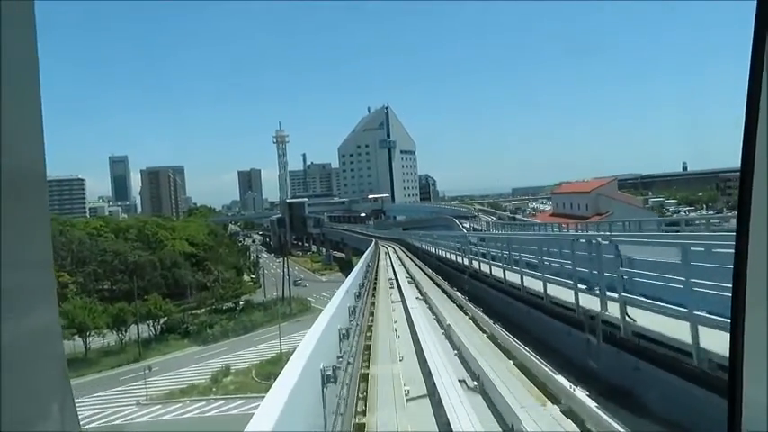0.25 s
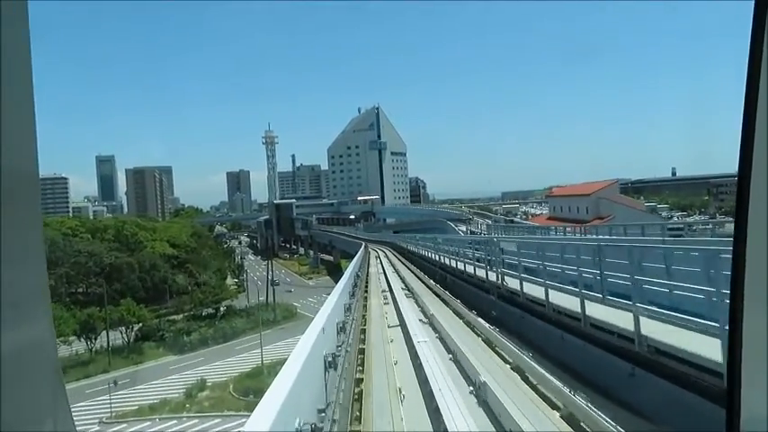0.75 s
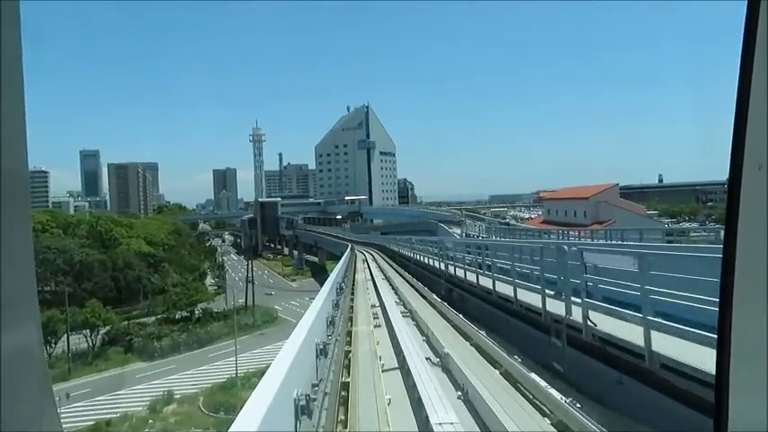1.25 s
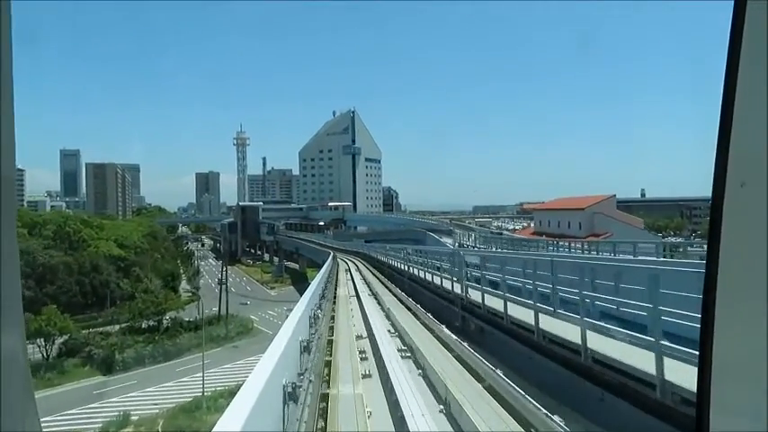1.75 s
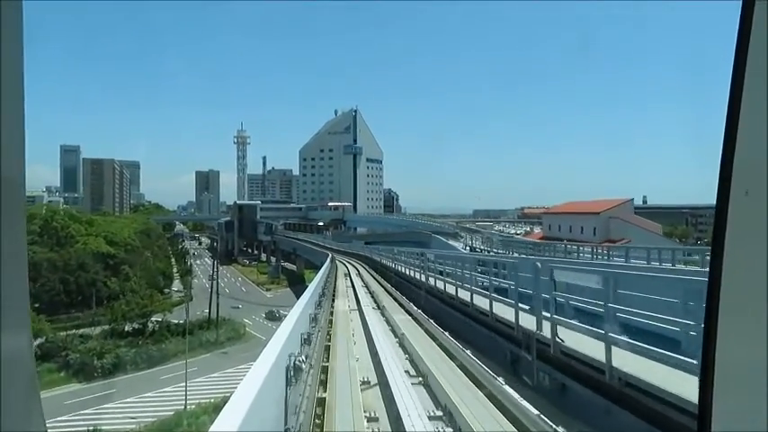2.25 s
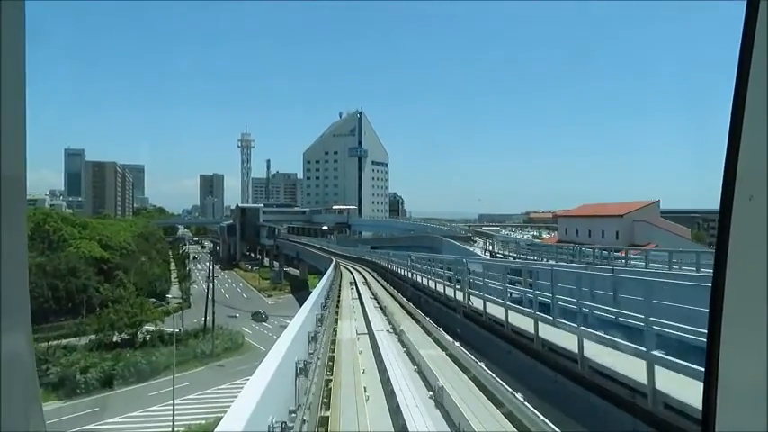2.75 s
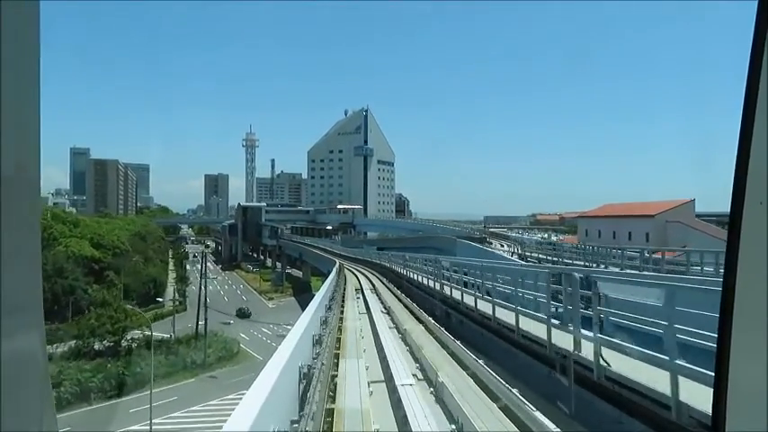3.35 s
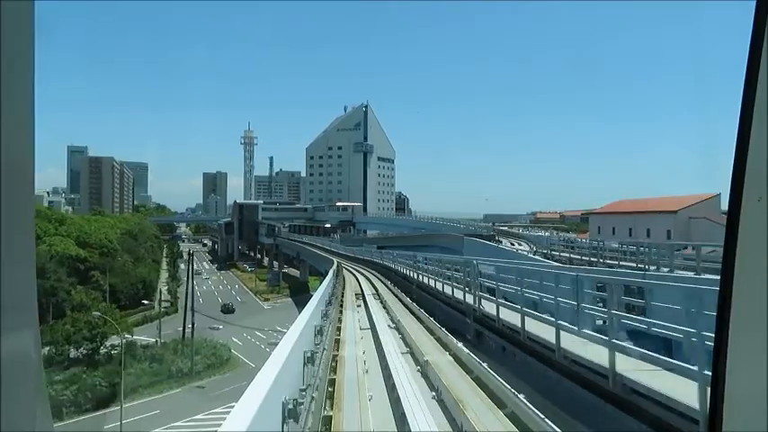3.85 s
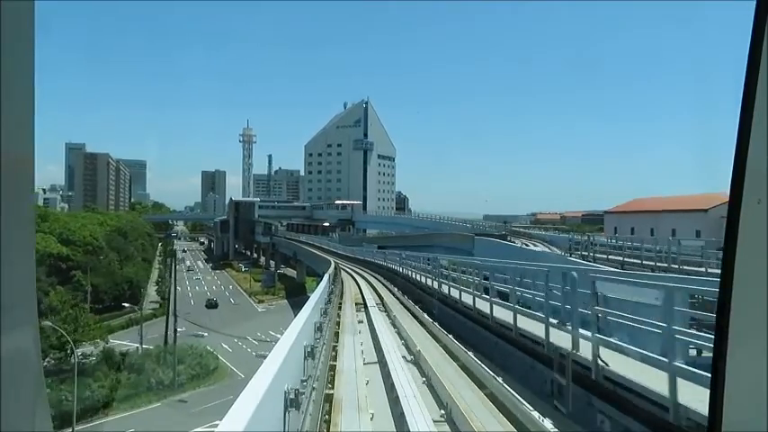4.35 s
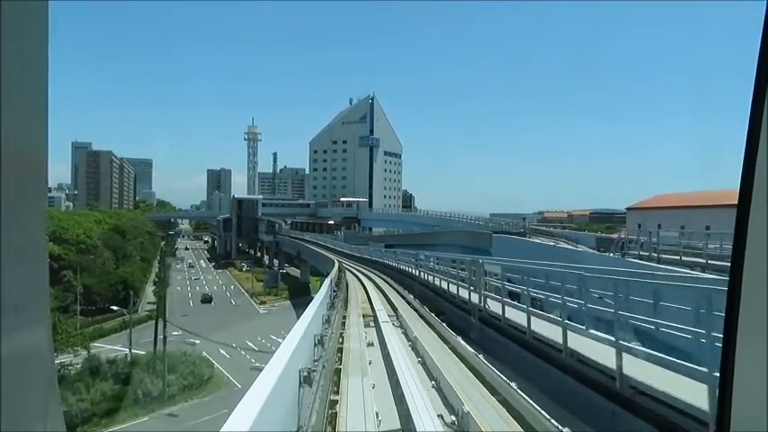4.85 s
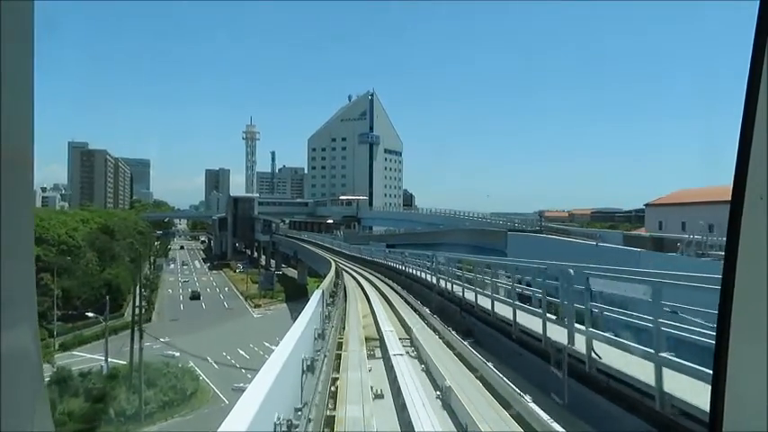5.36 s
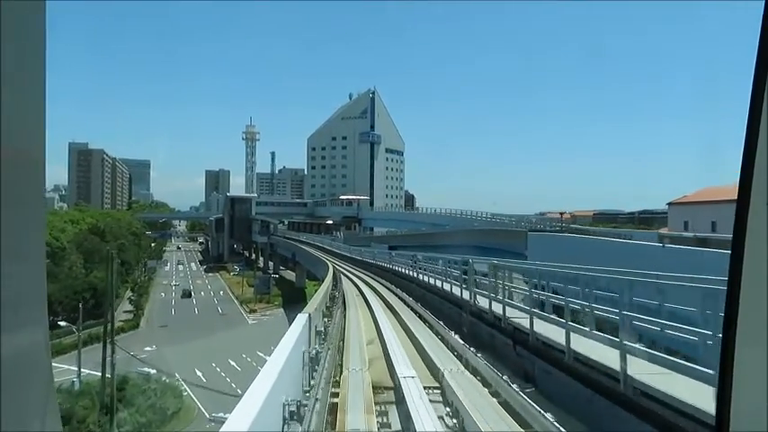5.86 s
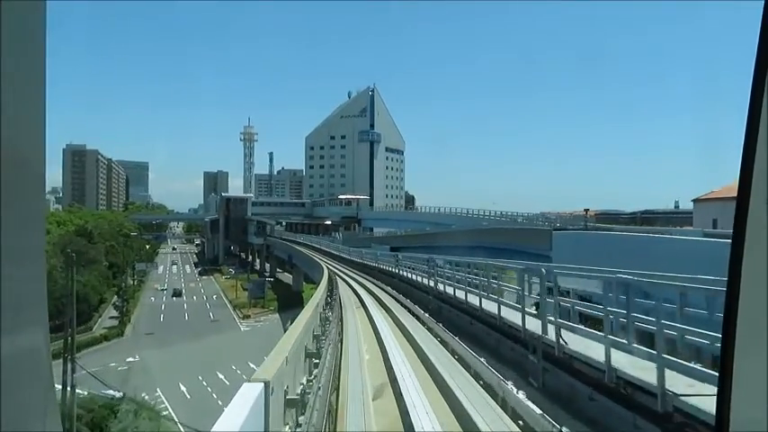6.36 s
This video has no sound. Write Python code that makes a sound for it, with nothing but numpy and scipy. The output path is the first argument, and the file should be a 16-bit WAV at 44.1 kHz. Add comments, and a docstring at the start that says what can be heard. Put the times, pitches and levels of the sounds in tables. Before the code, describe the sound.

Inside a rubber-tyred train, a deep shuddering rumble rolls on with soft joint thuds, a faint gear whine and an on-and-off hum.

```python
"""Inside the cabin of a rubber-tyred train on a raised concrete guideway, behind the front window.
Air hisses, the tyres roar and rumble on the concrete, and joints in it thud softly under the wheels.
The gears whine a little higher as the train gathers speed, and the tyre tread hums, drops out and
returns. Loudest of all, the car body shudders on its tyres and the floor booms."""
import sys
import numpy as np
from scipy import signal
from scipy.fft import rfft, irfft
from scipy.io import wavfile
from scipy.ndimage import uniform_filter1d

SR = 44100
rng = np.random.default_rng(int(sys.argv[2]) if len(sys.argv) > 2 else 0)


def wav_record(signal):
    """Record a signal, one row per channel, as 16-bit PCM in the file named by sys.argv[1]."""
    frames = np.transpose(np.atleast_2d(signal))
    bounded = np.clip(frames, -1, 1)
    # unit amplitude maps onto the largest positive 16-bit level
    quanta = np.round(bounded * 32767).astype(np.int16)
    wavfile.write(sys.argv[1], SR, quanta)


N = 291127
T = np.arange(N) / SR
SLOW = T[::64]  # coarse clock for slowly changing levels
FFT_SIZE = 2 ** 14 * (N // 2 ** 14 + 1)
FREQ = np.maximum(np.arange(FFT_SIZE // 2 + 1) * SR / FFT_SIZE, 1)


def undb(db):
    """Turn decibels into a gain."""
    return 10 ** (np.asarray(db) / 20)


def unit(x):
    """Scale to an average power of 1."""
    return x / np.sqrt(np.mean(x ** 2))


def curves(table):
    """Join a table's points with straight lines in time, one curve per column."""
    times, *columns = np.transpose(table)
    return [np.interp(T, times, column) for column in columns]


def colour(points):
    """Gain at each frequency from (frequency [Hz], level [dB]) points, silent outside them."""
    hz, db = np.transpose(points)
    return undb(np.interp(np.log(FREQ), np.log(hz), db, left=-200, right=-200))


def wander(rate):
    """A smooth random wobble of size 1, with `rate` new values a second."""
    hold = int(SR / rate)
    steps = np.repeat(rng.standard_normal(N // hold + 1), hold)
    return unit(uniform_filter1d(uniform_filter1d(steps, hold), hold)[:N])


def noise(points):
    """Steady noise of a given colour."""
    return unit(irfft(rfft(rng.standard_normal(FFT_SIZE)) * colour(points), FFT_SIZE)[:N])


def tone(hz, db, waver_hz, rate):
    """A pure tone whose pitch wavers at random."""
    return np.sqrt(2) * undb(db) * np.sin(2 * np.pi * np.cumsum(hz + waver_hz * wander(rate)) / SR)


def patchy(points, shared_db, own_db):
    """Noise in octave bands that follow the road texture together and also flicker alone."""
    out, texture = 0, wander(9)
    spectrum = rfft(rng.standard_normal(FFT_SIZE)) * colour(points)
    for octave in range(5, 15):
        share = np.cos(np.pi / 2 * np.clip(np.log2(FREQ) - octave, -1, 1)) ** 2
        band = irfft(spectrum * share, FFT_SIZE)[:N]
        out = out + band * undb(shared_db * texture + own_db * wander(14))
    return unit(out)


def even_out(x, hold_s, share):
    """Partly iron out the chance swells of a noise."""
    size = int(hold_s * SR)
    power = uniform_filter1d(uniform_filter1d(x ** 2, size), size)
    return unit(x / (np.abs(power) + 0.067 * np.mean(power)) ** (share / 2))


# Colour of the noise that differs between the ears: (frequency [Hz], relative level [dB])
WIDTH_COLOUR = [(70, -50), (123, -28), (200, -20.5), (253, -13), (320, -7), (420, -13.5), (531, -18),
                (717, -18.5), (926, -12.5), (1040, -14), (1300, -17.5), (2400, -22), (5200, -30),
                (7000, -30.5), (10000, -36.5), (14000, -37), (15400, -48)]

def stereo_width(wheels, hiss_db, lag_s=6.6e-5, bass_cut_hz=260):
    """Faint noise spreads out; wheel sounds come from the right and reach the left ear late."""
    spread_db = -57 + 0.8 * (hiss_db - hiss_db.mean())
    spread = undb(spread_db) * patchy(WIDTH_COLOUR, shared_db=0, own_db=1.4)
    side = spread - lag_s / 2 * SR * np.gradient(wheels)  # taking away the slope acts as a tiny delay
    bass_cut = np.sqrt(1 + (bass_cut_hz / FREQ) ** 6)  # deep bass stays in the middle
    return irfft(rfft(side, FFT_SIZE) / bass_cut, FFT_SIZE)[:N]


# Colours of the hiss and the roar: (frequency [Hz], relative level [dB])
HISS_COLOUR = [(2500, -8.5), (3300, -0.5), (4000, -3.5), (8000, -16.5), (12000, -25.5), (13800, -28),
               (15300, -40)]
ROAR_COLOUR = [(900, -35.5), (1060, -9.5), (1300, -9), (1500, -14), (2000, -18.5), (2500, -22),
               (2750, -22.5), (3100, -28.5), (4200, -48.5)]
# How loud the concrete is under the tyres: (time [s], relative roar [dB], relative hiss [dB])
ROAD_LEVELS = [(0.0, -55, -57), (0.03, -43, -59.5), (0.09, -46, -57.5), (0.68, -44.5, -56.5),
               (0.79, -50, -57), (0.84, -45, -55.5), (0.96, -46.5, -58.5), (1.16, -46.5, -53.5),
               (1.17, -40, -54.5), (1.27, -46, -54.5), (1.71, -40.5, -51.5), (1.75, -46, -56.5),
               (1.76, -43, -54.5), (2.22, -44, -54), (2.33, -46, -56.5), (2.48, -44, -51),
               (2.59, -43, -54.5), (2.61, -47.5, -58), (3.18, -42.5, -53.5), (3.29, -45.5, -55.5),
               (3.34, -42, -52.5), (3.56, -44.5, -55.5), (3.67, -42.5, -54), (3.79, -48, -57),
               (4.13, -44, -54.5), (4.23, -48, -56), (4.25, -41, -56), (4.28, -45.5, -54.5),
               (4.7, -42, -53.5), (4.8, -44.5, -56), (4.94, -41.5, -54.5), (5.0, -46.5, -57),
               (5.44, -42, -54), (5.5, -44.5, -54.5), (5.62, -42, -55), (5.64, -47.5, -58),
               (5.84, -45, -55), (5.97, -47.5, -57), (6.17, -44.5, -56), (6.6, -43, -53)]

def road_noise(ease_s=0.042, cabin_air_db=-64):
    """Tyres roar and hiss on concrete over the rush of cabin air. Also returns the hiss curve."""
    roar_db, hiss_db = uniform_filter1d(curves(ROAD_LEVELS), int(ease_s * SR), axis=1)
    roar_gain = undb(0.61 * roar_db + 0.4 * hiss_db + 6.5)
    hiss_gain = np.hypot(undb(hiss_db - 5), undb(cabin_air_db))
    roar = roar_gain * patchy(ROAR_COLOUR, shared_db=0.58, own_db=0.65)
    hiss = hiss_gain * patchy(HISS_COLOUR, shared_db=0.5, own_db=1.0)
    return roar + hiss, hiss_db


# Colours of the low tyre sounds: (frequency [Hz], relative level [dB])
RUMBLE_COLOUR = [(110, -22), (150, -2), (170, -3.5), (216, -1.5), (253, -8.5), (275, -14), (330, -32)]
DRONE_COLOUR = [(270, -3), (305, 3.5), (345, 0), (415, -5.5), (445, -2), (470, -6.5), (520, -5.5),
                (550, -10), (570, -1.5), (595, -5), (700, -5), (880, -2), (1000, -5.5), (1060, -16),
                (1200, -21)]
# Their loudness between joints: (time [s], rumble level [dB], relative drone level [dB])
TYRE_LEVELS = [(0.0, -37.5, -46), (0.13, -37, -38.5), (0.39, -42, -44.5), (0.48, -39, -41),
               (0.94, -41, -41), (1.32, -31, -39.5), (1.36, -46, -39), (1.4, -36.5, -37.5),
               (2.96, -35, -41), (3.14, -40.5, -39), (3.44, -30, -36.5), (3.47, -40, -40), (3.64, -33, -39),
               (3.67, -37, -41.5), (4.17, -34.5, -38.5), (4.36, -39, -41.5), (4.39, -35, -37),
               (4.72, -34.5, -38), (4.76, -31.5, -42.5), (4.8, -39, -41), (5.77, -38.5, -40.5),
               (5.92, -31.5, -41), (5.97, -39, -42.5), (6.6, -34, -38)]

def tyre_rumble(jolt):
    """Rolling tyres make a low rumble and a higher drone; both swell at each joint."""
    rumble_db, drone_db = curves(TYRE_LEVELS)
    rumble_gain = np.hypot(undb(rumble_db + 1.2 * wander(11)), jolt)
    drone_gain = np.hypot(undb(drone_db + 3.5), 0.4 * jolt)
    rumble = rumble_gain * even_out(noise(RUMBLE_COLOUR), hold_s=0.052, share=0.63)
    drone = drone_gain * patchy(DRONE_COLOUR, shared_db=0, own_db=1.43)
    return rumble, drone


# Joints in the concrete: (time [s], strength [dB], brightness [dB per octave])
JOINTS = [(0.113, -28, -4), (0.477, -33, -6), (0.659, -34, 7), (1.296, -33, -9), (1.466, -30, 8),
          (1.817, -34.5, 0), (1.986, -36, -6), (2.026, -33, 1), (2.212, -32.5, 13), (2.453, -32.5, -2),
          (3.425, -32, -10), (3.976, -42, 7), (4.152, -32.5, -13), (4.619, -33, 11.5), (4.719, -37, -3),
          (5.275, -42, -4), (5.595, -34.5, 16), (5.841, -35, -3), (5.885, -35.5, -2), (5.93, -38, -10),
          (6.495, -36, 6)]
# Notes the floor panels ring at: (pitch [Hz], relative level [dB], time to fade by 60 dB [s])
PANEL_NOTES = [(199.5, 10.5, 0.047), (232, 2.5, 0.04), (350, 7.5, 0.07), (408, 0, 0.06), (458, 3.5, 0.076),
               (506, -3.5, 0.05), (590, -13, 0.031), (685, -14, 0.054)]

def joint_thuds(push_s=0.008):
    """Each joint rings the floor panels briefly; rubber softens the blow, and no two are alike."""
    out, t = np.zeros(N + SR), np.arange(SR // 3) / SR
    hz, note_db, fade_s = np.transpose(PANEL_NOTES)[:, :, None]
    rise = np.sin(np.pi / 2 * np.clip(t / push_s, 0, 1)) ** 2
    fade = np.exp(-np.log(1000) * t / fade_s)
    chance = rng.random((len(JOINTS), 3, len(hz), 1))
    for (time, db, brightness), (phase, detune, size) in zip(JOINTS, chance):
        gain = undb(note_db + brightness * np.log2(hz / 335) + 3 * (size - 0.5))
        pitch = hz * (1 + 0.034 * (detune - 0.5))
        ring = gain * np.sin(2 * np.pi * (pitch * t + phase)) * fade
        start = int(time * SR)
        out[start:start + len(t)] += undb(db) * rise * ring.sum(axis=0)
    return out[:N]


def joint_jolts(rise_s=0.028, fall_s=0.046):
    """The gain of the rumble each joint sets off: it peaks just after the blow, then dies away."""
    time, db, _ = np.transpose(JOINTS)[:, :, None]
    since_peak = SLOW - time - rise_s
    swell = np.exp(-np.where(since_peak < 0, (since_peak / rise_s) ** 2, since_peak / fall_s))
    return np.interp(T, SLOW, (undb(db - 5.5) * swell).sum(axis=0))


# How fast the gear teeth meet, rising with speed: (time [s], pitch [Hz])
GEAR_PITCH = [(0, 907), (.9, 911), (1.8, 920.5), (3, 933), (4.2, 939), (5.4, 942), (6.6, 943)]
# Loudness of the whine and of its octave (twice the pitch): (time [s], relative level [dB])
WHINE_LEVELS = [(0.0, -56), (0.18, -46), (0.22, -53), (0.48, -56), (0.51, -46.5), (1.25, -50),
                (1.54, -39.5), (1.56, -45), (1.69, -37), (1.78, -46), (1.82, -40), (2.28, -47), (2.39, -40),
                (2.48, -50), (2.54, -38), (2.7, -51), (2.85, -40.5), (3.33, -42), (3.47, -36.5),
                (3.66, -45), (3.67, -40), (3.82, -46.5), (3.95, -36.5), (4.04, -45), (4.15, -38),
                (4.19, -47), (4.37, -47), (4.39, -39), (4.58, -46), (5.22, -47), (5.39, -43), (5.83, -47.5),
                (5.9, -43), (5.94, -50), (6.07, -47), (6.6, -43)]
OCTAVE_LEVELS = [(.4, -67), (.65, -55), (.95, -68), (1.11, -52.5), (1.25, -56.5), (1.6, -49.5), (1.72, -50),
                 (1.88, -44), (2.0, -52), (2.05, -55), (2.29, -54), (2.45, -68)]
# Colour of the noise ringing in the gear case: (frequency [Hz], relative level [dB])
CASE_COLOUR = [(800, -24), (850, -7), (900, -3), (940, -1.5), (985, -5), (1010, -10.5), (1040, -25)]

def gear_whine():
    """Gear teeth whine unevenly in a rattling case; two higher tones swell once."""
    hz, db, octave_db = curves(GEAR_PITCH)[0], curves(WHINE_LEVELS)[0], curves(OCTAVE_LEVELS)[0]
    flicker_db = 2.6 * wander(55) + 0.73 * wander(15)
    whine = tone(hz, db - 2.5 + flicker_db, waver_hz=4.105, rate=70)
    case = undb(uniform_filter1d(db, SR // 5) - 4) * noise(CASE_COLOUR)
    octave = tone(2 * hz, octave_db + 0.8 * wander(30), waver_hz=2.4, rate=30)
    third_harmonic = tone(3 * hz, octave_db - 13 + 3 * wander(20), waver_hz=9, rate=40)
    return whine + case + octave + third_harmonic


# When the tread hums: (start [s], length [s], start level [dB], middle level [dB], end level [dB])
HUM_STRETCHES = [(0, 0.4, -32.5, -34, -34), (.57, .39, -34.5, -29, -32), (1.08, 0.21, -33, -27.5, -33.5),
                 (1.5, 0.4, -32, -27.5, -30), (1.93, 0.57, -27.5, -34, -40), (2.58, 0.82, -36, -31, -40.5),
                 (3.46, 0.54, -34.5, -29.5, -36.5), (4.26, 0.36, -34.5, -31, -29),
                 (4.79, 0.38, -37, -34, -31.5), (5.2, 0.095, -41, -43, -43),
                 (5.39, 0.29, -29.5, -29.5, -29.5), (5.8, 0.068, -44, -37, -38),
                 (5.97, 0.47, -32.5, -35, -33.5), (6.51, 0.19, -30.5, -32.5, -35)]
# Brief dips in the hum: (time [s], depth [dB])
HUM_DIPS = [(.18, 4), (.78, 14), (1.589, 4), (1.83, 4), (2.03, 10), (2.15, 8), (2.79, 7), (3.0, 6),
            (3.6, 5.5), (3.83, 6), (4.39, 15), (4.54, 5.5), (5.11, 0), (5.51, 8), (6.05, 4), (6.161, 4),
            (6.33, 9)]
# Colour of the noise around the hum: (frequency [Hz], relative level [dB])
TREAD_COLOUR = [(262, -22), (283, -1.5), (296, 0), (315, -6), (350, -20.5)]

def tread_hum(attack_s=0.025, release_s=0.044, dip_s=0.029, rest_db=-46, teeth_per_tread=3.172):
    """Tread blocks hum at a pitch that follows the speed; the hum sets in, dips and falls back."""
    gain = np.full(len(SLOW), undb(rest_db))
    for start, length, *levels in HUM_STRETCHES:
        end = start + length
        ramp = np.minimum((SLOW - start) / attack_s, (end - SLOW) / release_s)
        gate = np.clip(ramp + 0.5, 0, 1) ** 2
        db = np.interp(SLOW, [start, start + length / 2, end], levels)
        gain = np.maximum(gain, gate * undb(db))
    dips_db = sum(depth * np.exp(-((SLOW - time) / dip_s) ** 2) for time, depth in HUM_DIPS)
    hz = curves(GEAR_PITCH)[0] / teeth_per_tread
    hum = tone(hz, 1.1 * wander(36), waver_hz=1.6, rate=25) + undb(-13.5) * noise(TREAD_COLOUR)
    return np.interp(T, SLOW, gain * undb(-dips_db)) * hum


# The floor's three deep notes: (pitch [Hz], waver size [Hz], waver rate [per s])
FLOOR_NOTES = [(75.65, 4.1, 14), (103.8, 9.93, 14), (136.7, 6.18, 12)]
# Their loudness, one list per note: (time [s], relative level [dB])
FLOOR_LEVELS = [
    [(0.0, -25), (0.09, -26.5), (0.33, -39), (0.72, -30), (0.73, -43), (0.77, -36), (1.17, -38),
     (1.3, -31.5), (1.58, -35), (1.71, -30), (1.76, -41), (1.91, -28.5), (2.0, -42), (2.02, -35),
     (2.26, -31), (2.37, -40), (2.48, -31), (2.54, -43), (2.61, -25), (2.65, -33.5), (3.09, -34.5),
     (3.12, -28), (3.2, -36), (3.4, -28), (3.55, -40), (3.64, -25), (3.67, -34), (4.03, -37), (4.06, -28),
     (4.41, -34.5), (4.47, -25.5), (4.52, -40), (4.61, -26), (4.67, -43), (4.69, -30), (4.8, -26),
     (4.82, -34), (5.04, -35), (5.07, -45), (5.39, -32), (5.4, -25), (5.75, -33.5), (5.92, -27.5),
     (6.07, -37.5), (6.19, -28), (6.32, -40), (6.38, -30), (6.6, -34)],
    [(0.0, -36), (0.18, -44), (1.1, -37), (1.21, -57), (1.3, -29), (1.87, -40), (2.5, -29), (2.68, -43),
     (2.92, -31), (3.0, -51), (3.01, -38), (3.93, -37.5), (4.1, -41), (5.2, -37), (5.26, -33), (5.77, -44),
     (5.84, -27), (5.9, -48), (6.34, -36), (6.6, -39)],
    [(0.0, -43), (0.16, -48), (2.37, -41.5), (2.39, -29.5), (2.76, -42), (3.29, -51), (3.33, -31),
     (3.55, -27.5), (3.73, -46), (3.79, -33), (4.28, -35), (4.37, -42.5), (5.94, -35), (6.01, -56),
     (6.19, -35), (6.6, -47)],
]

def floor_boom():
    """The floor booms in surges at its own notes, over a broad, low thrum."""
    out = undb(-32) * noise([(38, -0.5), (55, -8), (90, -5), (135, -13)])
    for (hz, waver_hz, rate), levels in zip(FLOOR_NOTES, FLOOR_LEVELS):
        db = curves(levels)[0] - 2.2 + 2 * wander(9.9)
        out += tone(hz, db, waver_hz, rate)
    return out


# The shaking of the car body: (time [s], pitch [Hz], relative level [dB])
SHUDDER = [(0.0, 24.9, -34.5), (0.09, 25.4, -36), (0.16, 27.8, -27), (0.27, 29.5, -23), (0.33, 30.6, -33.5),
           (0.62, 30.1, -29), (0.66, 30.2, -40), (0.7, 30, -22), (0.81, 30.3, -22), (0.84, 30.4, -38),
           (0.96, 30.1, -21), (1.05, 28.4, -28.5), (1.12, 27.8, -37), (1.29, 27.5, -29), (1.34, 27.4, -41),
           (1.45, 26.26, -23), (1.63, 27.8, -31), (1.8, 27.7, -26), (1.91, 29.2, -26), (2.13, 29.1, -28),
           (2.19, 30.95, -35), (2.22, 31.4, -25.5), (2.37, 31.6, -27), (2.52, 30.18, -28.5),
           (2.63, 30.1, -26), (2.77, 32.94, -32), (2.79, 32.8, -42), (2.87, 33.03, -26), (3.07, 31.94, -45),
           (3.14, 31.5, -25.5), (3.27, 33.05, -29.5), (3.38, 30.1, -28.5), (3.44, 30.2, -25.5),
           (3.62, 30.4, -33.5), (3.75, 27.5, -23.5), (4.01, 27.5, -34), (4.17, 27.6, -26),
           (4.26, 27.7, -38), (4.32, 27, -29), (4.39, 25, -37), (4.52, 24.87, -27), (4.65, 27.63, -28.5),
           (5.04, 27.55, -21.5), (5.11, 27.57, -40), (5.22, 27.7, -26), (5.27, 27.7, -42),
           (5.4, 27.76, -31), (5.51, 28.9, -26.5), (5.66, 28.87, -24), (5.72, 28.75, -31),
           (5.96, 30.5, -25.5), (6.01, 31.26, -36), (6.09, 31.45, -20.5), (6.21, 31.75, -35),
           (6.53, 31.63, -24), (6.6, 31.66, -30)]

def body_shudder():
    """The car shakes on its tyres: a very deep tone, with rough noise that follows its level."""
    hz, db = curves(SHUDDER)
    db = db - 1 + 1.7 * wander(7)
    rough = noise([(12, -7.5), (28, -16), (44, -12.5)])
    return tone(hz, db, waver_hz=2.466, rate=15) + undb(db - 8.5) * rough


def scene():
    """Add up the sources: both ears hear the same bass, while the treble differs between them."""
    road, hiss_db = road_noise()
    rumble, drone = tyre_rumble(joint_jolts())
    wheels = rumble + joint_thuds() + tread_hum()
    middle = road + drone + wheels + gear_whine() + floor_boom() + body_shudder()
    side = stereo_width(wheels, hiss_db)
    return np.array([middle + side, middle - side])


def record(dry):
    """Cut the treble above 15400 Hz, with a filter already settled when the sound begins."""
    lowpass = signal.ellip(8, 0.2, 70, 15400, fs=SR, output="sos")
    settled = signal.sosfilt_zi(lowpass)[:, None] * dry[None, :, :1]
    return signal.sosfilt(lowpass, dry, zi=settled)[0]


dry = scene()
out = record(dry)
wav_record(out)
```